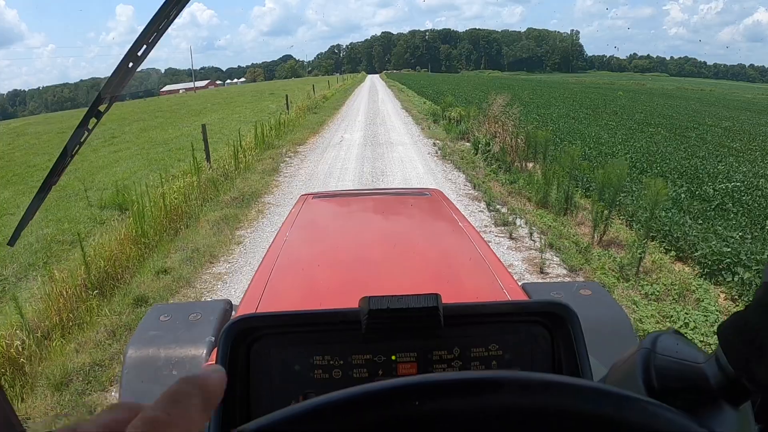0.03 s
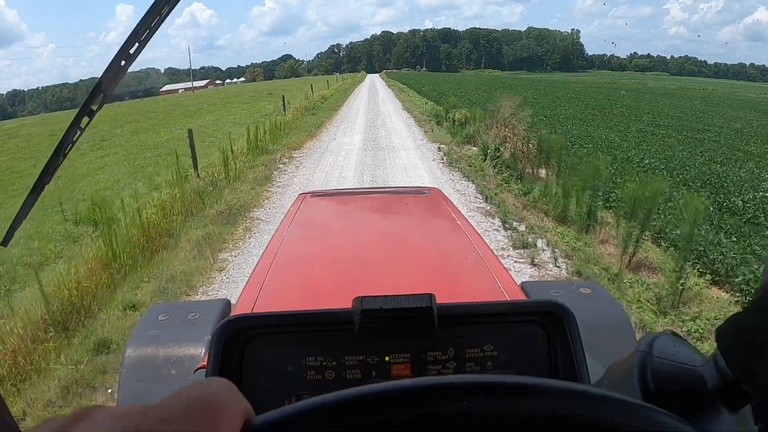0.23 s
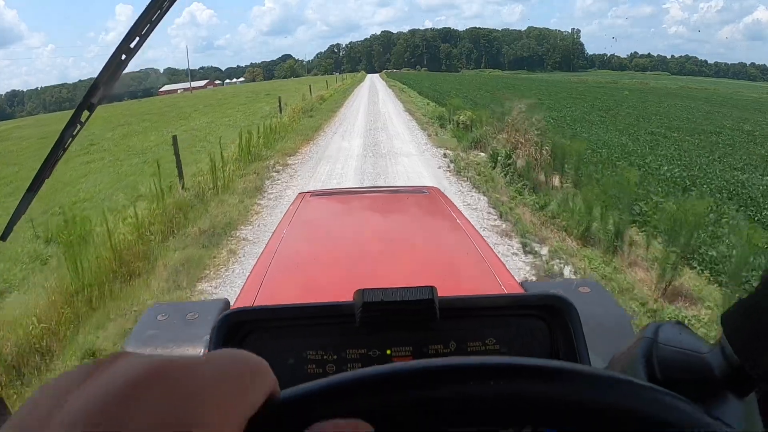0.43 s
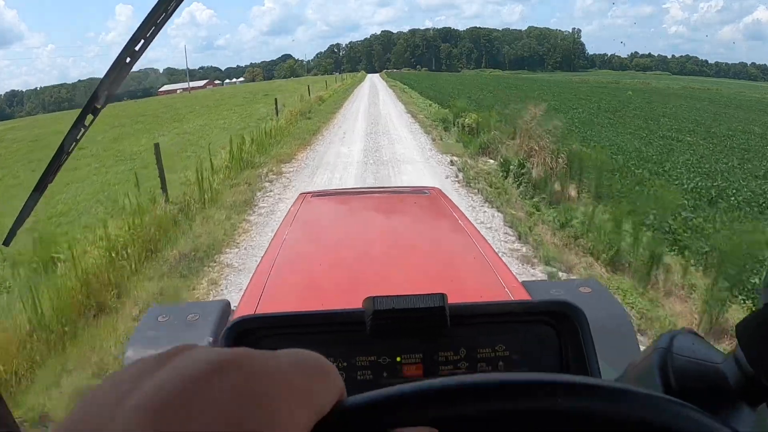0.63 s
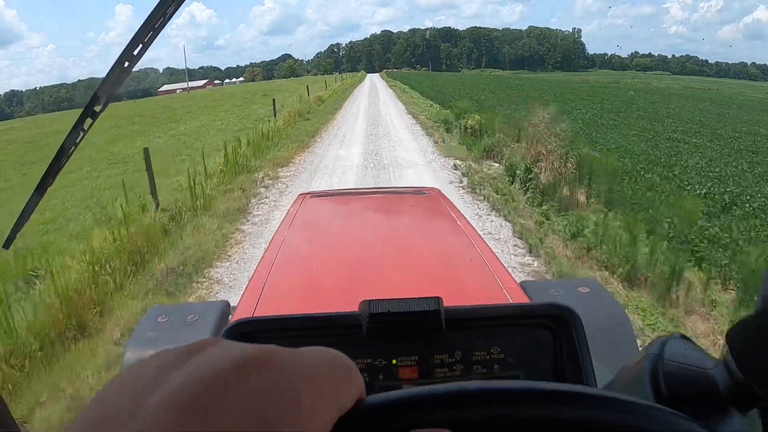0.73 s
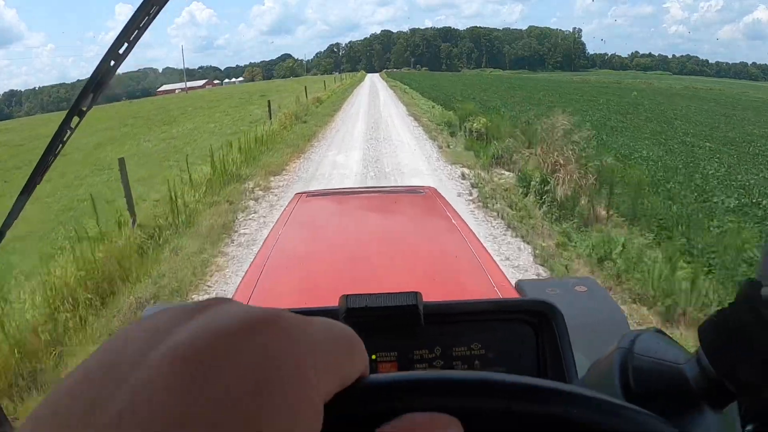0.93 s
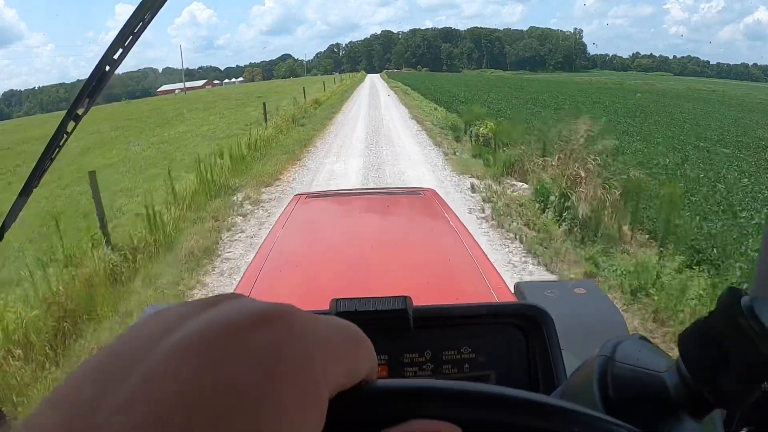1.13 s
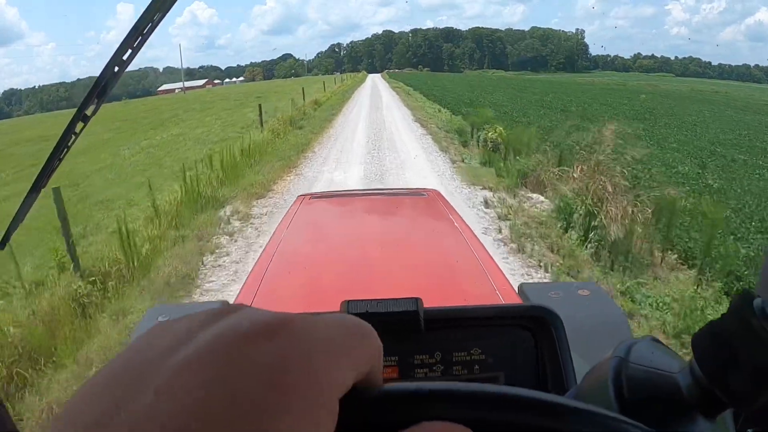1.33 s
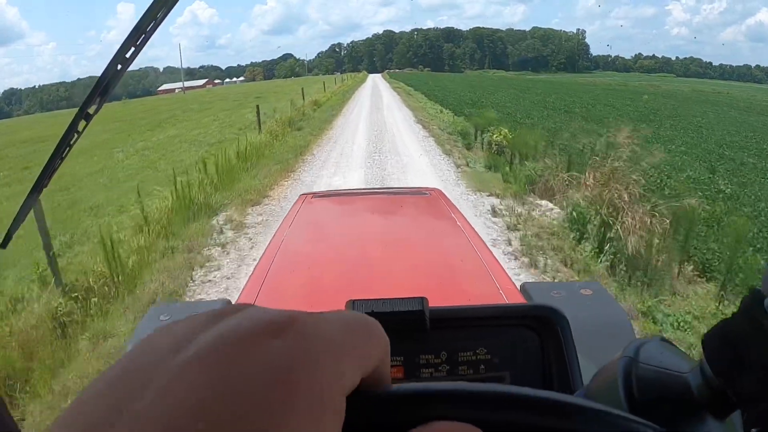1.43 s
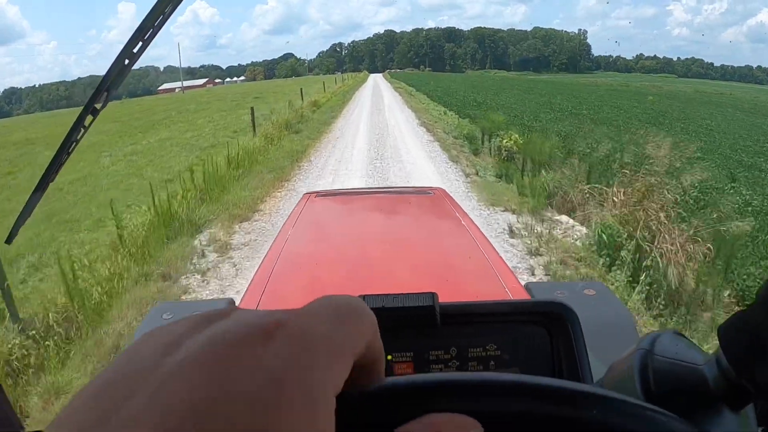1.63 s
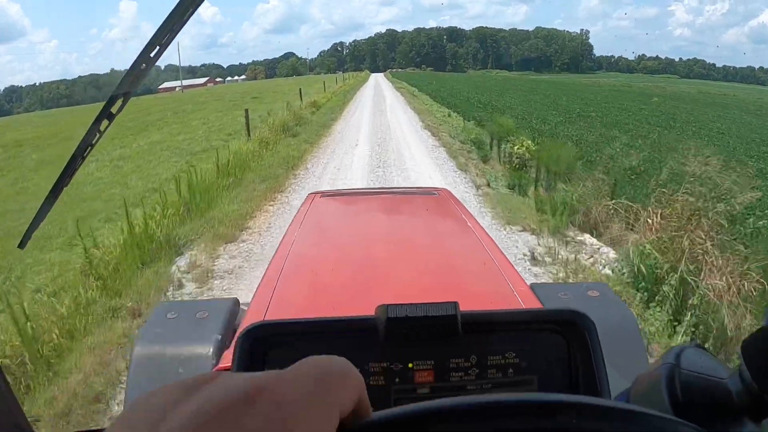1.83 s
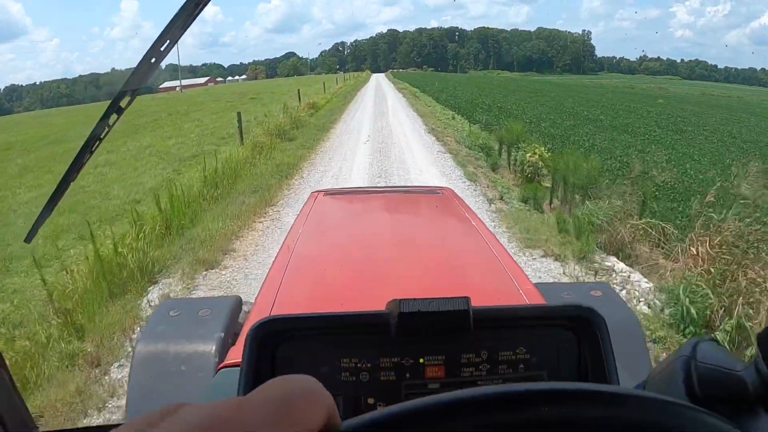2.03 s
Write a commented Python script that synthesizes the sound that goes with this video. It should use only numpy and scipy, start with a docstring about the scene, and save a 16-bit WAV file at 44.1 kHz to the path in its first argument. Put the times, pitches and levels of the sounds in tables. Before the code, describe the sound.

A diesel tractor engine fades in quickly at about 0.2 seconds and holds a deep, booming drone at steady revs, heard from inside the cab. Muffled engine clatter and a faint gear whine come through the panels, over a low, uneven rumble of the shaking cab. The clatter is strongest around 0.5 seconds, then slowly eases while the drone continues to the end at about 2 seconds.

```python
"""A deep, steady drone fades in quickly from silence: a six-cylinder diesel tractor on a gravel
lane, heard inside the cab. The engine's firing rate booms in the cab air. Behind it, combustion
clatter, engine overtones and gear whine come through the panels, and the cab rumbles as it
shakes on its tyres. The revs hold steady while the treble slowly eases off."""
import sys
import numpy as np
from scipy import signal
from scipy.fft import rfft, irfft
from scipy.io import wavfile
from scipy.ndimage import uniform_filter1d, map_coordinates

SR = 44100
rng = np.random.default_rng(int(sys.argv[2]) if len(sys.argv) > 2 else 0)


def transcribe(signal):
    """Save signal, clipped to [-1, 1], as a 16-bit WAV file at the path in sys.argv[1]."""
    frames = np.atleast_2d(signal).T
    limited = np.clip(frames, -1, 1)
    pcm = np.round(limited * 32767).astype(np.int16)
    wavfile.write(sys.argv[1], SR, pcm)


N = 91463
CYLINDERS = 6


def undb(db):
    return 10 ** (np.asarray(db) / 20)


def unit(x):
    """Scale to an rms of 1."""
    return x / np.sqrt(np.mean(x ** 2))


def curve(rows):
    """Automation lanes: each column after the time, joined by straight lines."""
    rows = np.array(rows, float)
    return [np.interp(np.arange(N) / SR, rows[:, 0], col) for col in rows.T[1:]]


def waver(rate_hz):
    """Smooth random modulation, rms 1."""
    hold = int(SR / rate_hz)
    steps = np.repeat(rng.standard_normal(400), hold)[:N]
    return unit(uniform_filter1d(uniform_filter1d(steps, hold), hold))


def colour(x, points):
    """EQ through (Hz, dB) points, then scale to rms 1."""
    hz, db = np.array(points, float).T
    bin_hz = np.maximum(np.arange(N // 2 + 1) * SR / N, 1)
    gain = undb(np.interp(np.log(bin_hz), np.log(hz), db))
    return unit(irfft(rfft(x) * gain, N))


def lowpass(x, hz):
    """A smooth low-pass, 24 dB an octave."""
    bin_hz = np.arange(N // 2 + 1) * SR / N
    return irfft(rfft(x) / (1 + (bin_hz / hz) ** 4), N)


def tone(turns):
    """A sine of rms 1 with a random starting phase."""
    return np.sqrt(2) * np.sin(2 * np.pi * (turns + rng.random()))


# EQ of the cab's rumble (frequency [Hz], relative gain [dB])
RUMBLE_EQ = [(8, -31.5), (16, -7.5), (24, 0), (35, 1.5), (45, -7), (60, -20.5), (85, -25.5), (150, -40.5)]
def cab_rumble(level_db=-25.5, swell_db=2):
    """The cab shakes in uneven swells as the tyres roll over gravel."""
    rumble = colour(lowpass(rng.standard_normal(N), hz=140), RUMBLE_EQ)
    return rumble * undb(level_db + swell_db * waver(7.9))


# Gear and pump whines (pitch at mean revs [Hz], base level [dB], waver depth [dB])
WHINE_PARTIALS = [(275.4, -37.5, 2), (404, -49.5, 0.5), (553.4, -46.5, 1), (814.6, -48.5, 1.5),
                  (828, -47.5, 4), (954, -48.5, 2.5), (1085, -55.5, -3), (1230, -53, 4.5),
                  (1290.3, -44.5, 0.5), (1585, -53.5, 0.5), (2046, -50, 2), (3290, -64.5, 2.5),
                  (3610, -65, 1.5)]
def gear_whine(firing_hz, drift=0.00061):
    """Gears and pumps sing at pitches that track the revs, each wavering on its own."""
    speed = firing_hz / firing_hz.mean()
    whine = np.zeros(N)
    for hz, db, waver_db in WHINE_PARTIALS:
        pitch_hz = hz * speed * (1 + drift * waver(12))
        whine += tone(np.cumsum(pitch_hz) / SR) * undb(db + waver_db * waver(16))
    return whine


# Quiet engine partials (multiple of the four-stroke cycle rate, base level [dB])
ENGINE_PARTIALS = {3: -45, 8: -40, 9: -40.5, 10: -44, 12: -36.5, 14: -40, 15: -42.5, 18: -45, 20: -48, 24:
                   -44, 32: -45.5, 36: -38}
def engine_tones(cycles, waver_db=-1):
    """Overtones of the firing, and partials between them from unequal cylinders."""
    return sum(tone(multiple * cycles) * undb(db + waver_db * waver(8.4))
               for multiple, db in ENGINE_PARTIALS.items())


# Accent of each cylinder, in firing order (relative level [dB])
KNOCK_ACCENTS = [-0.35, -2.9, -1.5, 2, -1.6, 1.8]
def knock_envelope(cycles, firing_hz, decay_s=0.007, scatter_db=1.4):
    """Each firing knocks the block: a sharp attack and a fast decay."""
    firings = cycles * CYLINDERS
    count = firings.astype(int)
    accent_db = np.array(KNOCK_ACCENTS)[count % CYLINDERS]
    strength = undb(accent_db + scatter_db * rng.standard_normal(400)[count])
    age_s = (firings % 1) / firing_hz
    return unit(strength * np.exp(-age_s / decay_s))


# EQ of the clatter inside the cab (frequency [Hz], relative gain [dB])
CAB_EQ = [(70, -3.5), (130, 4.5), (185, -1), (215, -5), (260, -2), (340, 1), (470, -2.5), (600, -1),
          (635, -6.5), (690, -3), (810, -6.5), (880, -13.5), (1000, -9), (1350, -10), (1800, -14.5),
          (2300, -15.5), (2600, -19.5), (3050, -23), (3280, -19), (3420, -29), (3650, -26), (4000, -33),
          (4550, -31), (4800, -35.5), (6800, -38.5), (7600, -41.5), (9500, -44.5)]
def clatter(cycles, firing_hz, base_db=-29.5, repeat_share=0.33, knock_depth=0.3, panel_hz=11500):
    """Combustion rattle, part repeating every engine cycle and part new, dulled by the panels."""
    knocks = knock_envelope(cycles, firing_hz)
    cycle_samples = CYLINDERS * SR / firing_hz.mean()
    loop_position = (cycles % 1) * cycle_samples
    looped = map_coordinates(rng.standard_normal(N), [loop_position], order=3, mode="mirror")
    noise = np.sqrt(repeat_share) * looped + np.sqrt(1 - repeat_share) * rng.standard_normal(N)
    rattle = noise * (1 - knock_depth + knock_depth * knocks)
    muffled = lowpass(lowpass(rattle, panel_hz), panel_hz)
    return undb(base_db) * colour(muffled, CAB_EQ)


# Fader ride on the clatter (time [s], low band gain [dB], high band gain [dB])
CLATTER_RIDE = [(.28, 1, 3), (.5, 3, 4), (.65, 3, 3), (.94, 1.6, 0.5), (1.2, -1, -1), (1.7, -2, -3),
                (1.86, -2.3, -3), (2.05, -4, -2.5)]
def ease_off(rattle, tones, crossover_hz=660, tone_follow=0.83):
    """The clatter slowly recedes in two bands; the tones follow the low band's fader."""
    low_db, high_db = curve(CLATTER_RIDE)
    low = lowpass(rattle, crossover_hz)
    high = rattle - low
    return low * undb(low_db) + high * undb(high_db) + tones * undb(tone_follow * low_db)


# Fader ride on the boom (time [s], gain [dB])
BOOM_RIDE = [(.28, 0), (.5, -0.4), (.9, -.2), (1.2, 1.2), (1.65, -0.3), (1.85, 1.5), (2.05, 0.5)]
def cab_boom(cycles, base_db=-15, waver_db=0.43):
    """The firing rate, swollen by the air in the cab to an almost pure drone."""
    return tone(CYLINDERS * cycles) * undb(base_db + curve(BOOM_RIDE)[0] + waver_db * waver(14))


# Near-steady engine revs (time [s], firing rate [Hz])
REVS = [(0.28, 113.42), (0.55, 112.98), (0.74, 113.57), (0.89, 113.02), (1.03, 113.45), (1.26, 113.06),
        (1.57, 113.68), (1.73, 112.85), (1.87, 113.55), (2.02, 113.44)]
def scene():
    """The mix at the driver's seat: the revs drive every layer but the rumble."""
    firing_hz = curve(REVS)[0]
    cycles = np.cumsum(firing_hz) / SR / CYLINDERS  # every cylinder fires once a cycle
    rattle = clatter(cycles, firing_hz)
    tones = engine_tones(cycles) + gear_whine(firing_hz)
    return (ease_off(rattle, tones) + cab_boom(cycles) + cab_rumble())[None]


def record(dry, silence_s=0.19, fade_s=0.079, fade_power=1.85, top_hz=15500):
    """A moment of silence, a quick fade-in, and a steep high cut."""
    fade = np.clip((np.arange(N) / SR - silence_s) / fade_s, 0, 1) ** fade_power
    high_cut = signal.ellip(8, .2, 70, top_hz, fs=SR, output="sos")
    return signal.sosfilt(high_cut, dry * fade)


dry = scene()
out = record(dry)
transcribe(out)
```